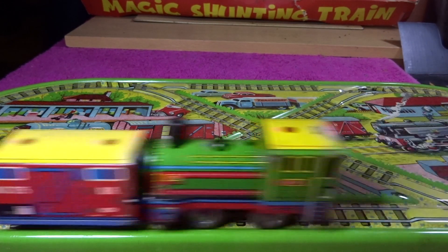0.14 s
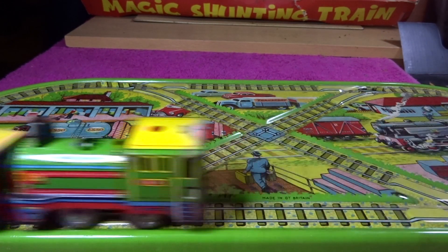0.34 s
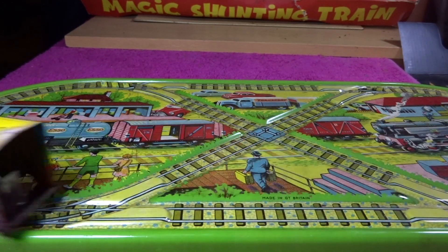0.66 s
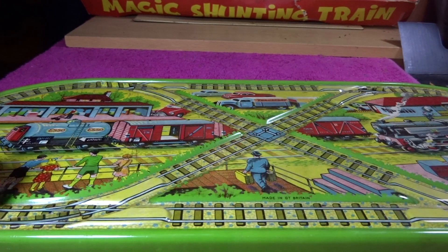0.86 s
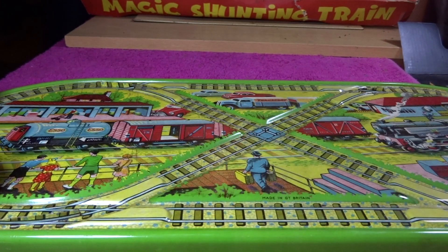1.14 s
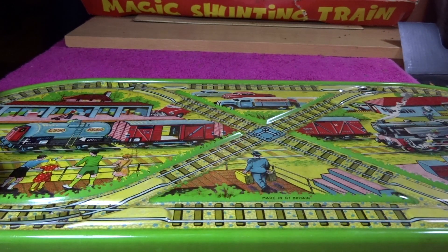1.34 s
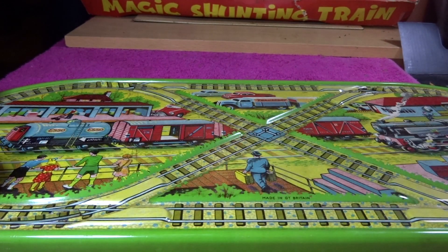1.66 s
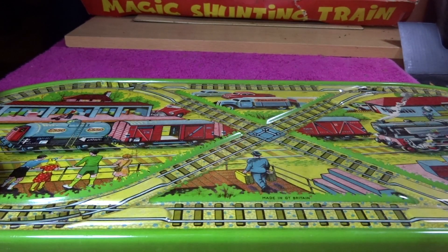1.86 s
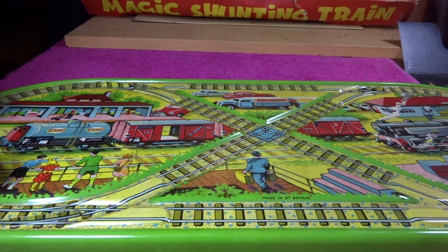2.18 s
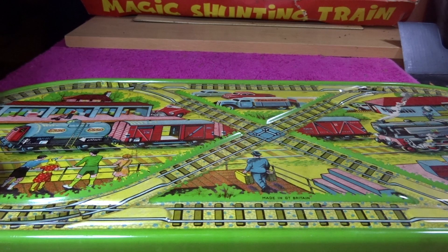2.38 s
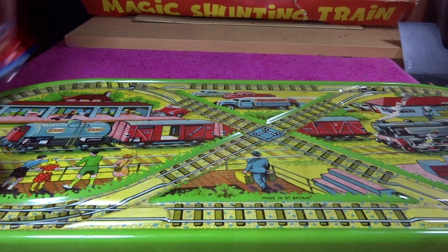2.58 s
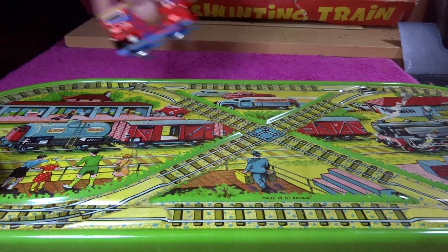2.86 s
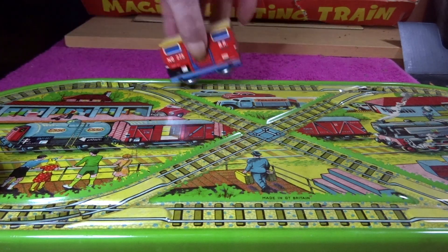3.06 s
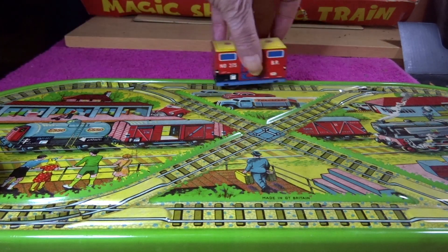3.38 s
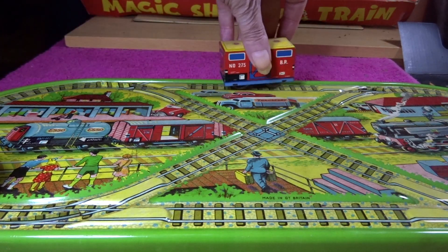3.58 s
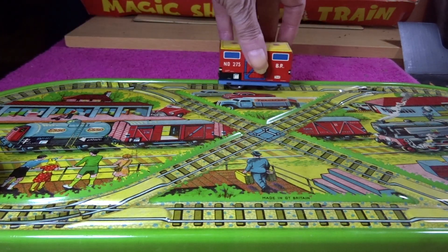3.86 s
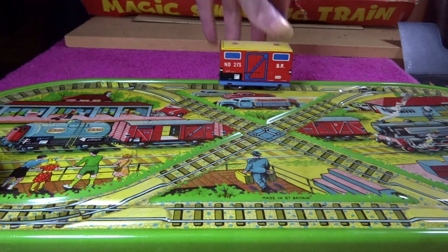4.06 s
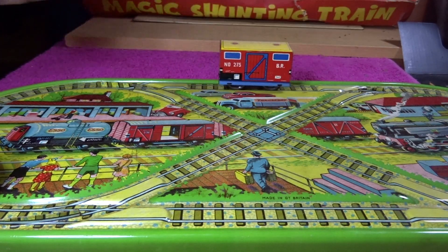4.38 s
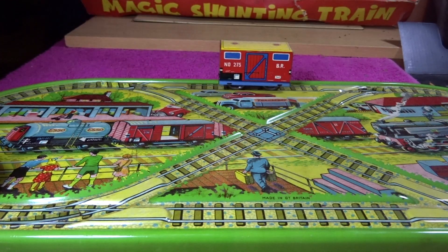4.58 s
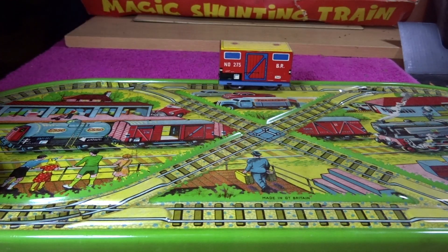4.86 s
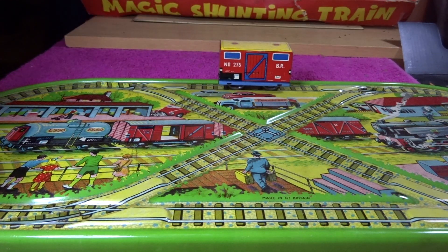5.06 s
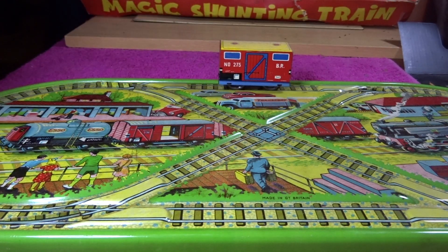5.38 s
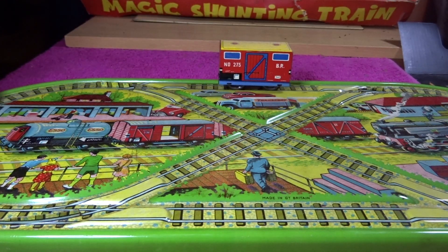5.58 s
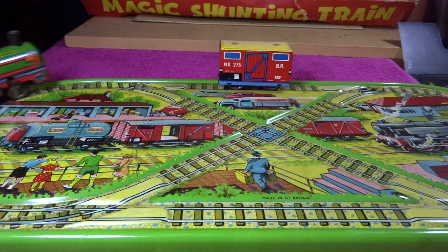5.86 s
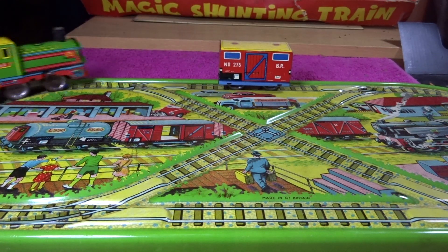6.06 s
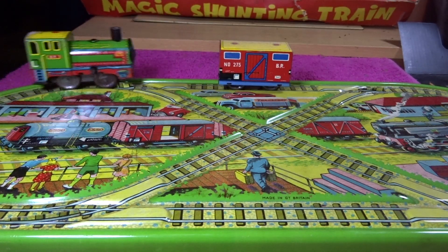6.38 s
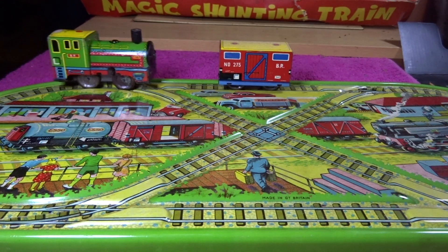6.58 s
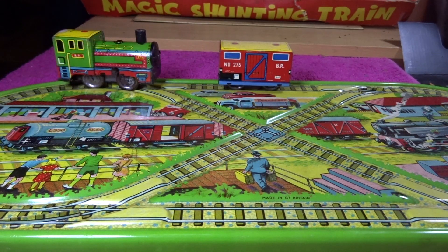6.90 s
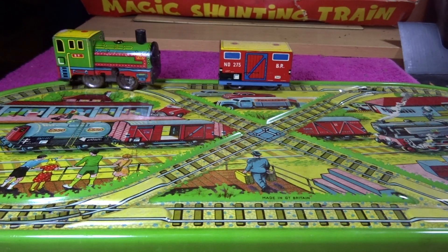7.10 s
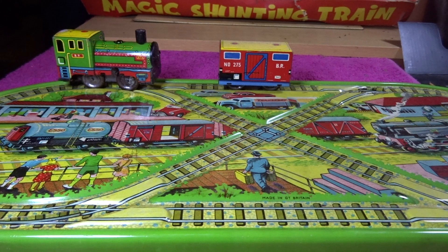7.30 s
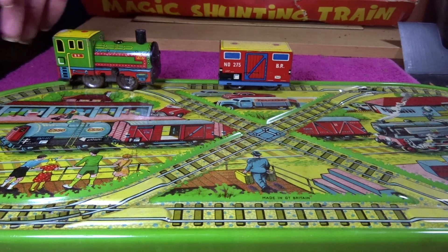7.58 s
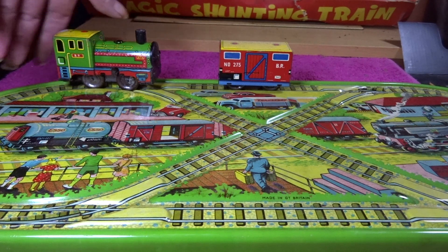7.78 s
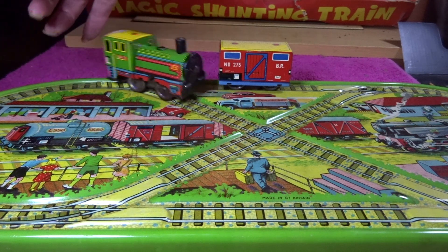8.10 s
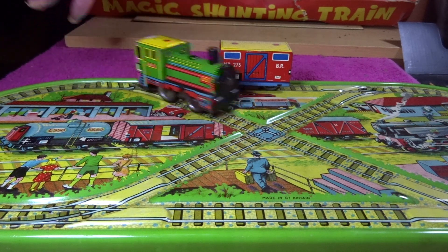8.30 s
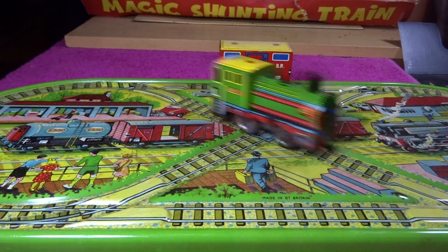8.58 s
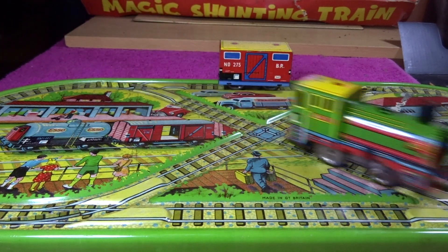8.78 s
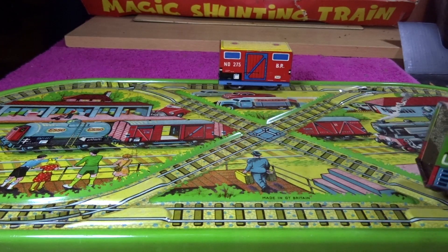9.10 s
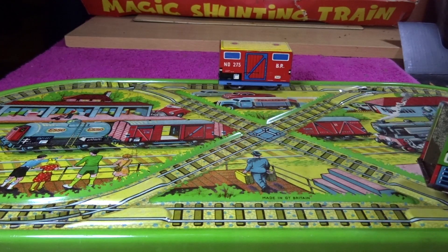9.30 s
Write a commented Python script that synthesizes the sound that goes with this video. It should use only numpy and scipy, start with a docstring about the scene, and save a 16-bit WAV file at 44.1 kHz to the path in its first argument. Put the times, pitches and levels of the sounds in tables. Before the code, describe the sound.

Very close in a small, dry room, a wind-up tin locomotive runs on a tin track. A brief clatter stops at once; after a pause it restarts with uneven knocks, races into a metallic buzz, then slows and knocks again. Another stop with tiny ticks, a second knocking and whirring run, a quiet gap, and a short weak rattle at the end. Soft room hush fills the stops.

```python
"""In a small room, close to the microphone, a clockwork tinplate locomotive runs on a tin track.
It is held still three times. Its governor knocks slowly under load and races into a buzz when free,
while the gear teeth chatter. Short bursts of noise model the contacts; filters and decaying noise model
the ringing shell, cab panels and hollow track plate. Squeaks, ticks, whines and a soft hush join them."""
import sys
import numpy as np
from scipy import signal
from scipy.fft import rfft, irfft
from scipy.io import wavfile
from scipy.ndimage import uniform_filter1d

SR = 44100
rng = np.random.default_rng(int(sys.argv[2]) if len(sys.argv) > 2 else 0)


def bounce(signal):
    """Save signal as a 16-bit WAV file at the path given by the first command-line argument."""
    frames = np.transpose(np.atleast_2d(signal))
    limited = np.clip(frames, -1, 1)
    pcm = np.round(limited * 32767).astype(np.int16)
    wavfile.write(sys.argv[1], SR, pcm)


N = 416304
TIME = np.arange(N) / SR   # s
CUTOFF_HZ = 15850


def amp(db):
    """Logarithmic level: decibels to amplitude gain."""
    return 10 ** (np.asarray(db) / 20)


def in_time(rows):
    """Linear interpolation: each column of a timed table, sample by sample."""
    s, *columns = np.transpose(rows)
    return [np.interp(TIME, s, column) for column in columns]


def during(rows):
    """Time gate: true from the first row of a timed table to its last."""
    return (TIME >= rows[0][0]) & (TIME <= rows[-1][0])


def drift(per_s):
    """Slow random modulation: normal knots of spread 1 joined by straight lines."""
    knots = np.arange(0, N / SR + 1, 1 / per_s)
    return np.interp(TIME, knots, rng.standard_normal(len(knots)))


def die_away(x, seconds):
    """Exponential relaxation: spreads each impulse into a fall of the same area."""
    r = np.exp(-1 / (seconds * SR))
    return signal.lfilter([1 - r], [1, -r], x + 1e-18)


def colour(x, spectrum, modes):
    """Causal resonance: a minimum-phase filter of unit power gain, narrow modes on a broad spectrum."""
    size = 8192
    hz = np.maximum(np.fft.rfftfreq(size, 1 / SR), 1)
    points = np.array(spectrum)
    broad_db = np.interp(np.log(hz), np.log(points[:, 0]), points[:, 1])
    modes_db = sum(lift / (1 + (2 * (hz - f) / width) ** 2) for f, width, lift in modes)
    gain = amp(broad_db + modes_db)
    gain /= np.sqrt(np.mean(gain ** 2 * (hz < CUTOFF_HZ)))
    cepstrum = irfft(np.log(gain))
    cepstrum[1:size // 2] *= 2      # minimum phase: nothing sounds before the blow
    cepstrum[size // 2 + 1:] = 0
    response = irfft(np.exp(rfft(cepstrum)))
    return signal.oaconvolve(x, response[None], axes=1)[:, :N]


def band_noise(hz, width_hz, size):
    """Resonance excited by noise: one two-pole mode, rms 1."""
    r, run_in = np.exp(-np.pi * width_hz / SR), int(SR / width_hz)
    poles = [1, -2 * r * np.cos(2 * np.pi * hz / SR), r * r]
    x = signal.lfilter([1, 0, -1], poles, rng.standard_normal(size + run_in))[run_in:]
    return x / x.std()


def ring_out(t60=0.2, treble_damping=0.27, side_db=-21.5):
    """Diffuse decay: countless tin modes and near walls as noise dying faster in the treble; mid energy 1."""
    t = TIME[:SR // 2]
    hz = np.fft.rfftfreq(len(t), 1 / SR)
    white = rfft(rng.standard_normal((2, len(t))))
    edges = [0, 700, 1400, 2800, 5600, 11200, 22400]   # Hz
    total = 0
    for lo, hi in zip(edges, edges[1:]):
        band_t60 = t60 * ((lo + hi) / 7000) ** -treble_damping   # t60 holds at 3500 Hz
        band = irfft(white * ((hz >= lo) & (hz < hi)), len(t))
        total = total + band * amp(-60 * t / band_t60)
    mid, side = total
    return (mid + amp(side_db) * side * [[1], [-1]]) / np.sqrt(np.sum(mid ** 2))


def reverberate(x):
    """Convolution: the input answered by a fresh diffuse decay."""
    return signal.oaconvolve(x[None], ring_out(), axes=1)[:, :N]


# spectrum of the room's hush: (frequency [Hz], relative density [dB])
HUSH_SPECTRUM = [(15, -84), (25, -51), (166, -15), (263, -11.5), (335, -7.5), (373, -14), (427, -6),
                 (607, -17), (863, -10.5), (1020, -20), (1700, -20), (2110, -26.5), (5730, -26),
                 (6740, -26.5), (16000, -34)]
# resonances standing on it: (frequency [Hz], width [Hz], lift [dB])
HUSH_RESONANCES = [(173, 12, 8), (313, 39, 8), (890, 280, 0), (1720, 150, 7), (2870, 620, 5.5)]


def background(side_db=-17, bass_db=-52.5, treble_db=-51.0, waver_db=0.4):
    """Stationary filtered noise: a soft hum and hiss whose level wavers a little."""
    mid, side = rng.standard_normal((2, N))
    air = colour(mid + amp(side_db) * side * [[1], [-1]], HUSH_SPECTRUM, HUSH_RESONANCES)
    bass = signal.sosfiltfilt(signal.butter(4, 1000, fs=SR, output="sos"), air)
    treble = air - bass
    hush = amp(bass_db) * bass / bass.std() + amp(treble_db) * treble / treble.std()
    return amp(waver_db * drift(2.3)) * hush


# the motor's runs between the stops; before a start the gears creep through their slack:
# (let go [s], braked [s], strength [dB], creep relative to strength [dB])
MOTOR_RUNS = [(0, 0.062, 0, -11), (.709, 4.7, 0, -18.5), (5.628, 7.98, 0, -9.5), (9.34, 10.04, -9.5, 1)]


def drive_level(take_up_db_per_s=263, brake_db_per_s=180):
    """Spring drive: its level in dB climbs as the gears take up and falls linearly under the brake."""
    levels = []
    for start, stop, db, creep_db in MOTOR_RUNS:
        take_up = (TIME < start) * (creep_db - take_up_db_per_s * (start - TIME))
        brake = brake_db_per_s * np.maximum(TIME - stop, 0)
        levels.append(db + take_up - brake)
    return np.max(levels, axis=0)


def turn_time():
    """Rotation period in s: one turn lasts from knock to knock, or two beats of a race."""
    s = knock_rows()[:, 0]
    turns = [((a + b) / 2, b - a) for a, b in zip(s, s[1:]) if .015 < b - a < .1]
    turns += [(at, 2 / per_s) for _, _, race in GOVERNOR_RACES for at, per_s, _ in race]
    return in_time(sorted(turns))[0]


def rattle_level(full_db=-11.5, sag_db=21.5, slow_turn_s=0.069):
    """Speed-dependent excitation: the rattle in dB follows the drive and sags with turn time squared."""
    return full_db - sag_db * (turn_time() / slow_turn_s) ** 2 + drive_level()


def tooth_chatter(per_s=420, play=.6, scatter_db=4, contact_s=0.00057):
    """Backlash impacts: gear teeth with play slap at uneven moments; mean power 1."""
    early, hard = rng.uniform(-1, 1, (2, N // 20))
    at = (np.cumsum(1 + np.clip(play, 0, 1) * early) * SR / per_s).astype(int)
    slaps = np.zeros(N)
    slaps[at[at < N]] = amp(scatter_db * hard[at < N]) ** 2
    power = die_away(slaps, contact_s)
    return power / power.mean()


def shaken(power, ring_db, shift_db, count):
    """Load sharing: force shifts among the bearings as the toy rolls, each ringing in its own way."""
    loads = np.array([amp(shift_db * drift(4)) ** 2 for _ in range(count)])
    out = 0
    for load in loads / loads.sum(axis=0):
        force = np.sqrt(power * load) * rng.standard_normal(N)
        out = out + force + amp(ring_db) * reverberate(force)
    return out / np.sqrt(1 + amp(ring_db) ** 2)


# how the tin answers along the track: (time [s], rattle [dB], cab panels relative to rattle [dB],
# track plate relative to rattle [dB])
TIN_ANSWER = [(0, 1, 4, 0.5), (.85, .5, -0.5, -6.5), (1.19, 0, -6, -12.5), (1.48, -3, -10.5, -6.5),
              (1.75, -0.5, -4.5, -16.5), (2.05, -1.5, -11.5, -16), (2.35, 1, -9.5, -30),
              (2.62, -1, -6.5, -32), (2.85, 1, -7.5, -23), (3.4, -0.1, -2.5, -15), (3.7, 0.1, -5.5, -14),
              (3.9, -0.5, -1.5, -11.5), (4.23, 2.5, -8, -25), (4.6, -1, 1.5, -9), (5.75, 1.5, -7.5, -15),
              (5.92, -2, -18, -18.5), (6.45, 1.5, -25, -14), (6.9, -0.5, -2, -5.5), (7.18, -1, -11, -15.5),
              (7.52, -1.3, -14, -6), (7.9, 1, -9, -18), (9.35, 5, -2.5, -7)]
# spectra of the shell, gear teeth, cab panels and track plate: (frequency [Hz], relative density [dB])
SHELL_SPECTRUM = [(30, -55), (100, -43), (170, -52), (300, -20.5), (500, -10), (1000, -7), (1800, -1.5),
                  (2700, -0.5), (3300, 5), (4200, 2), (5200, -2), (6600, 0), (8500, -1.5), (14000, -20.5)]
TEETH_SPECTRUM = [(4000, -37), (8000, -14.5), (9600, 3), (11000, 4.5), (12500, 0.5), (14000, -4),
                  (15400, -2), (16000, -7.5)]
CAB_SPECTRUM = [(100, -50.5), (450, -27), (700, -18), (950, -16), (1170, -12.5), (1310, 2.5), (1410, 1),
                (1560, -4.5), (1900, -14), (2400, -14.5), (3000, -20), (8000, -33.5)]
TRACK_SPECTRUM = [(30, -53), (100, -38.5), (170, -25.5), (260, -23), (320, -15), (440, -2), (570, 0.5),
                  (720, -6), (1000, -3), (1500, -4.5), (5000, -28.5)]
# narrow modes of the tinplate, also heard in the knocks: (frequency [Hz], width [Hz], lift [dB])
TINPLATE_MODES = [(636, 27, 5), (886, 17, 6), (1084, 11, 3.5), (1300, 130, -1), (2177, 31, 5),
                  (2317, 58, 4.5), (2525, 54, 7.5), (2704, 30, 5), (3085, 48, 7.5), (3400, 28, -2.5),
                  (3890, 8.4, 8.5), (4273, 24, 8.5), (5390, 57, 5.5), (6340, 48, 3.5), (8540, 53, 3),
                  (10160, 370, 5.5), (15100, 450, 6.5)]


def locomotive(labour_db=-5.5, race_db=-3, shell_db=-2.0, teeth_db=-5.5, cab_db=-2.5, track_db=0):
    """Forced vibration: beats and tooth chatter drive the shell, teeth, cab panels and track plate."""
    answer_db, cab_rel_db, track_rel_db = in_time(TIN_ANSWER)
    rattle_db = rattle_level() + answer_db
    labouring = 1 - sum(during(race) for _, _, race in GOVERNOR_RACES)
    slaps = tooth_chatter()
    motion = amp(race_db) ** 2 * racing_power(slaps) + labouring * amp(labour_db) ** 2 * slaps
    drive = shaken(amp(rattle_db) ** 2 * motion, ring_db=0.2, shift_db=13, count=6)
    shell = amp(shell_db) * colour(drive, SHELL_SPECTRUM, TINPLATE_MODES)
    teeth = amp(teeth_db) * colour(drive, TEETH_SPECTRUM, TINPLATE_MODES)
    cab = amp(cab_db + cab_rel_db) * colour(drive, CAB_SPECTRUM, TINPLATE_MODES)
    track = amp(track_db + track_rel_db) * colour(drive, TRACK_SPECTRUM, TINPLATE_MODES)
    return shell + teeth + cab + track + squeaks(rattle_db)


BRUSH_LEAD_S = 0.014   # the governor weight brushes its drum this long before each knock


def squeaks(rattle_db, low_hz=9600, high_hz=13800, width_hz=1500, length_s=0.011, ring_db=-9.0):
    """Frictional excitation: each brush of the governor weight, and each racing beat, squeaks very high."""
    rubs = []
    for s, _, brush_db in knock_rows():
        rubs.append((max(int((s - BRUSH_LEAD_S - length_s / 2) * SR), 0), brush_db))
    for _, squeak_db, race in GOVERNOR_RACES:
        share = np.clip(in_time(race)[1], .01, 1)
        for at in beats(race):
            firmness_db = 40 * np.log10(share[at])   # faint where chatter outweighs the beats
            rubs.append((at - int(length_s * SR / 4), rattle_db[at] + squeak_db + firmness_db))
    swell, out = np.hanning(int(length_s * SR)), np.zeros(N)
    for at, db in rubs:
        rub = band_noise(rng.uniform(low_hz, high_hz), width_hz, len(swell))
        out[at:at + len(swell)] += amp(db) * swell * rub
    return out + amp(ring_db) * reverberate(out)


# under load the governor knocks once a turn, in spells that slow down or speed up evenly:
# (first knock [s], last knock [s], knocks [count], last gap / first gap [ratio],
#  relative knock level [dB], relative brush level [dB])
KNOCK_SPELLS = [(0.0127, 0.142, 3, 1.16, -3, -29), (0.715, 0.781, 3, .83, -2.5, -28),
                (0.821, 0.832, 2, 1, 1, -17), (0.882, 0.9265, 2, 1, -1.5, -34),
                (0.9637, 1.1425, 6, 0.68, -2, -33), (4.238, 4.4255, 7, 1.33, -1.5, -17.5),
                (4.4622, 4.6074, 4, 1.38, -2, -40), (4.665, 4.789, 3, 1.201, -.5, -38),
                (5.629, 5.8423, 6, 1.42, -3, -23), (5.991, 6.0584, 3, 1.7, -3.5, -19.5),
                (6.0915, 6.1879, 4, 0.64, -3, -32), (6.2135, 6.386, 6, 0.86, -3, -26),
                (6.4203, 6.5463, 4, 1.05, -2.5, -25), (6.5966, 6.701, 3, 1.24, -2.5, -33),
                (6.763, 6.9602, 4, 1.22, -1.4, -46), (7.017, 7.1105, 3, 0.93, -1.5, -20),
                (7.144, 7.204, 3, 0.89, 0, -20), (8.036, 8.101, 2, 1, -3.5, -28),
                (9.3388, 9.383, 2, 1, -.5, -35)]


def knock_rows():
    """Evenly changing period: every knock of every spell, (time [s], knock level [dB], brush level [dB])."""
    rows = []
    for first, last, count, slowing, db, brush_db in KNOCK_SPELLS:
        elapsed = np.cumsum(np.r_[0, np.linspace(1, slowing, round(count) - 1)])
        rows += [(s, db, brush_db) for s in first + (last - first) * elapsed / elapsed[-1]]
    return np.array(rows)


# spectrum of a knock: (frequency [Hz], relative density [dB])
KNOCK_SPECTRUM = [(30, -40), (100, -41), (170, -26), (250, -22), (330, -14), (520, -8), (1400, -2.5),
                  (2400, -6.5), (3600, 4), (5200, -4), (6500, -1), (8000, -4.5), (10500, -5.5), (15000, -7)]


def knocks(knock_db=-5.0, tap_db=0, scatter_db=1.0, contact_s=0.0014, bounce_share=0.28, bounce_s=0.0057):
    """Impact: a light brush tap, then a hard, bright burst of contacts; the loose wheels bounce on."""
    drive_share = 0.2   # share of the drive's dB change that also reaches the knocks
    s, db, brush_db = knock_rows().T
    blows, at = np.zeros(N), (s * SR).astype(int)
    scatter = rng.normal(0, scatter_db, len(s))
    blows[at] = amp(db + knock_db + drive_share * drive_level()[at] + scatter) ** 2
    blows[np.maximum(at - int(BRUSH_LEAD_S * SR), 0)] += amp(brush_db + tap_db) ** 2
    decay = die_away(blows, contact_s) + bounce_share * die_away(blows, bounce_s)
    force = shaken(contact_s * SR * decay, ring_db=-0.2, shift_db=7.5, count=4)
    return colour(force, KNOCK_SPECTRUM, TINPLATE_MODES)


# small ticks of the tin at rest:
# (time [s], relative level [dB], centre frequency [Hz], ring-out relative to tick [dB])
TIN_TICKS = [(0.447, -30.5, 6500, -18), (4.913, -34, 3830, 6.5), (4.919, -35, 3700, -3),
             (5.064, -41, 4800, -12), (9.209, -26, 13600, -20), (9.268, -31, 4360, -4)]


def ticks(contact_s=0.00042, sharpness=1.6, level_db=9.5):
    """Transient excitation: small dry ticks as the tin settles and the catch shifts."""
    out, tail = np.zeros((2, N + SR)), ring_out()
    t = TIME[:tail.shape[1]]
    for s, db, hz, ring_db in TIN_TICKS:
        burst = rng.standard_normal(len(t)) * np.exp(-t / contact_s)
        snap = signal.lfilter(*signal.iirpeak(min(hz, .45 * SR), sharpness, fs=SR), burst)
        snap *= amp(db + level_db) / np.abs(snap).max()
        ring = signal.fftconvolve(snap[None], tail, axes=1)[:, :len(t)]
        at = int(s * SR)
        out[:, at:at + len(t)] += snap + amp(ring_db) * ring
    return out[:, :N]


# tones and drones that swell out of the tin:
# (start [s], end [s], frequency [Hz], width [Hz], relative level [dB])
TIN_WHINES = [(0.664, 0.725, 520, 200, -39), (2.115, 2.32, 9800, 250, -30), (2.336, 2.608, 6440, 345, -29),
              (2.801, 3.17, 4243, 30.4, -32), (3.28, 3.439, 2540, 50, -24.5), (3.66, 3.84, 2600, 50, -26.5),
              (3.96, 4.12, 10870, 298, -26.5), (4.147, 4.545, 3200, 60, -27), (5.999, 6.807, 2280, 60, -30),
              (6.934, 7.02, 2340, 40.1, -31.5), (7.45, 7.949, 2516, 50, -28.5), (7.947, 8, 537, 89.4, -30),
              (8.383, 8.523, 326, 39, -53)]


def whines():
    """Narrow-band resonance: unsteady tones, each the noise of one mode, swell and fade."""
    out = np.zeros(N)
    for start, end, hz, width_hz, db in TIN_WHINES:
        swell, at = signal.windows.tukey(int((end - start) * SR), .5), int(start * SR)
        out[at:at + len(swell)] += amp(db) * swell * band_noise(hz, width_hz, len(swell))
    return out


def beats(race):
    """Phase accumulation: samples at which the racing governor strikes."""
    turns = np.cumsum(in_time(race)[0] * during(race)) / SR
    return np.flatnonzero(np.diff(np.ceil(turns))) + 1


def beat_power(race, slaps, limp_db=2.0, scatter_db=2.3, contact_s=0.0011, rise_s=0.00034):
    """Periodic impact: two beats a turn, one weaker at low speed, amid tooth chatter; mean about 1."""
    per_s, share = in_time(race)
    share, at = np.clip(share, 0, 1), beats(race)
    slowness = np.clip((115 - per_s[at]) / 35, 0, 1)
    weak = amp(-limp_db * slowness) ** 2
    limp = np.where(np.arange(len(at)) % 2, weak, 1) * 2 / (1 + weak)
    scatter = amp(rng.normal(0, scatter_db, len(at))) ** 2
    blows = np.zeros(N)
    blows[at] = limp * scatter * SR / per_s[at]
    beating = die_away(die_away(blows, contact_s), rise_s)
    return share * beating + (1 - share) * during(race) * slaps


# races of the free-running governor, two beats a turn:
# (relative force [dB], squeak relative to rattle [dB],
#  rows of (time [s], beat rate [1/s], share of rattle power that is beats [0-1]))
GOVERNOR_RACES = [(0.33, -4, [(1.168, 69, 0.5), (1.3, 99, .95), (1.38, 113, 0.96), (1.62, 107, 0.96),
                  (1.9, 90.4, 0.87), (2.13, 82.7, 0.8), (2.25, 81, 0.62), (2.7, 71.6, 0.8),
                  (2.9, 82.5, 0.54), (3.1, 83, 0.57), (3.35, 114, 0.6), (3.67, 118, 0.92), (3.8, 98, 0.68),
                  (4.05, 92, 0.83), (4.23, 71.6, 0.52)]), (0.022, -3, [(5.884, 122, 0.9), (5.93, 117, 1),
                  (5.96, 83, 0.76)]), (0.61, -3, [(7.22, 71, 0.7), (7.3, 111, 0.8), (7.4, 107, 0.97),
                  (7.55, 124, 0.96), (7.75, 111, .95), (7.985, 135, 0.53)])]


def racing_power(slaps):
    """Addition of powers: the beats and chatter of all races, each at its own force."""
    return sum(amp(force_db) ** 2 * beat_power(race, slaps) for force_db, _, race in GOVERNOR_RACES)


# the toy's place before the microphone: (time [s], left minus right [dB])
TOY_PLACE = [(1.2, 0), (2.2, -1.6), (3.2, -1.4), (3.8, 0.5), (5.8, 0.9), (7.2, 0.0), (7.8, -1.1),
             (9.4, -0.7)]


def scene():
    """Level-difference stereo: the toy moves a little from side to side in front of the microphone."""
    pan_db, = in_time(TOY_PLACE)
    toy = locomotive() + knocks() + whines() + ticks()
    return toy * amp(pan_db * np.array([[.5], [-.5]])) + background()


def record(dry, limit_db=-7.5):
    """Gain limiting and low-pass filtering: loud millisecond bursts are held down and the top is cut."""
    power = uniform_filter1d(np.mean(dry ** 2, axis=0), size=SR // 1000)
    gain = (1 + (power / amp(limit_db) ** 2) ** 3) ** (-1 / 6)
    limited = np.clip(dry * uniform_filter1d(gain, size=SR // 2000), -.9, .9)
    return signal.sosfilt(signal.ellip(12, .1, 80, CUTOFF_HZ, fs=SR, output="sos"), limited)


dry = scene()
out = record(dry)
bounce(out)
```